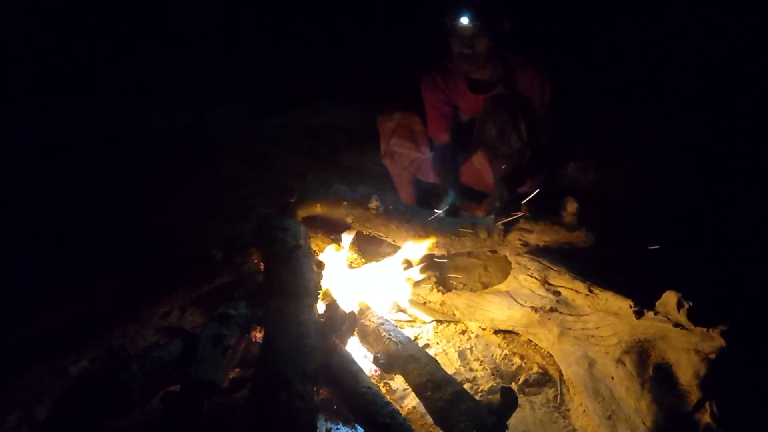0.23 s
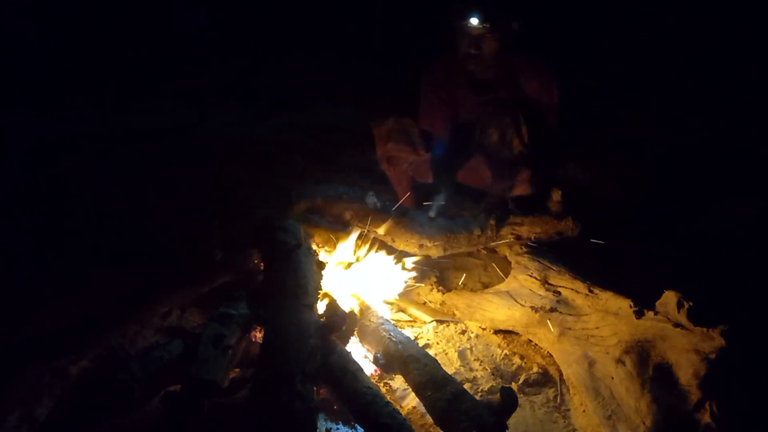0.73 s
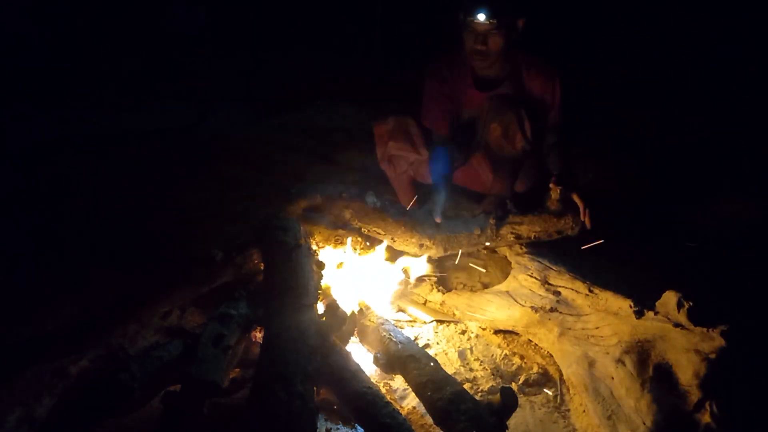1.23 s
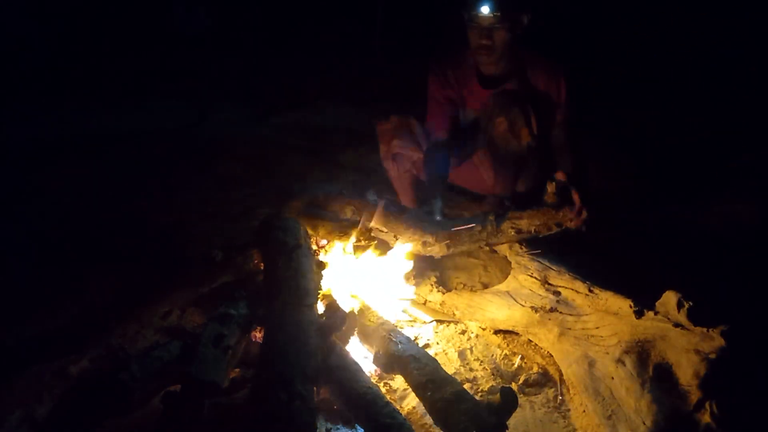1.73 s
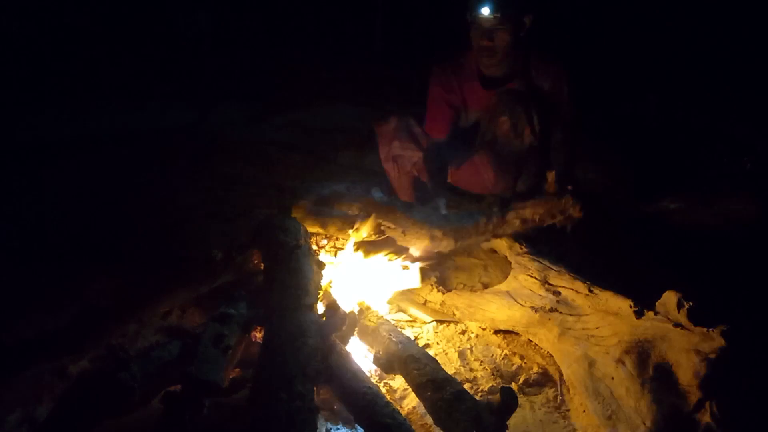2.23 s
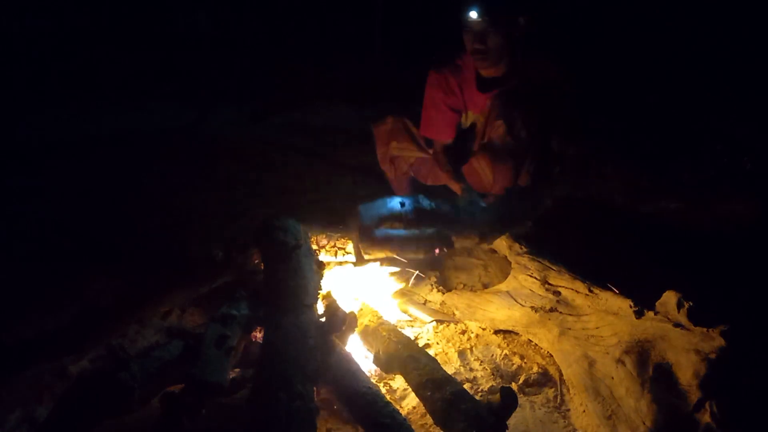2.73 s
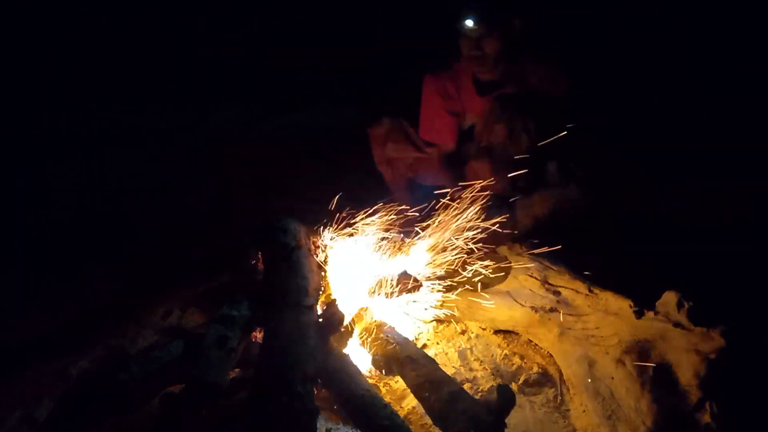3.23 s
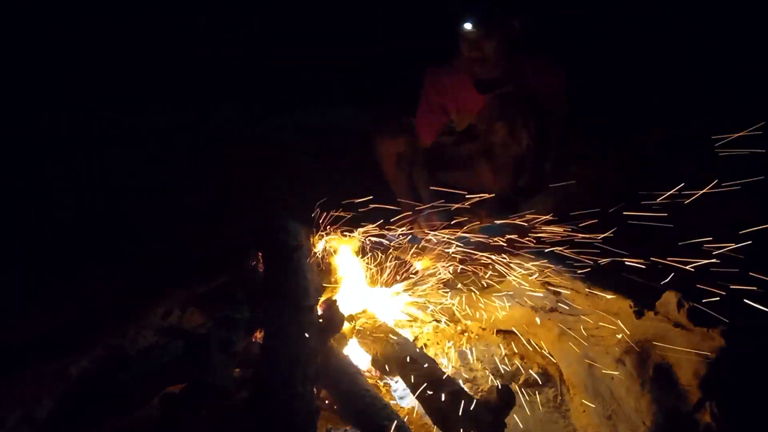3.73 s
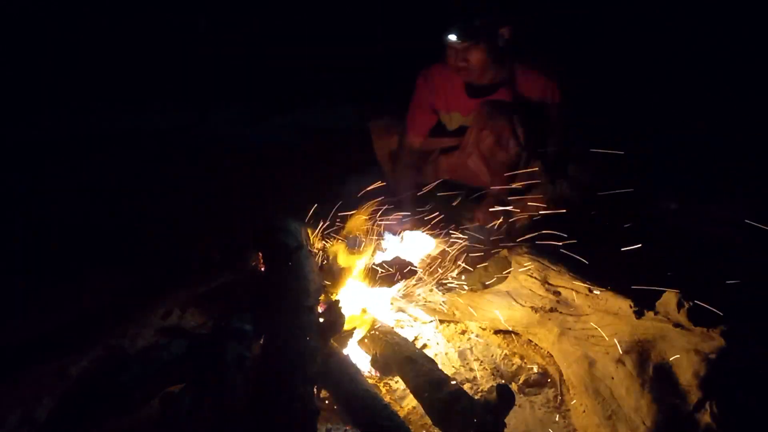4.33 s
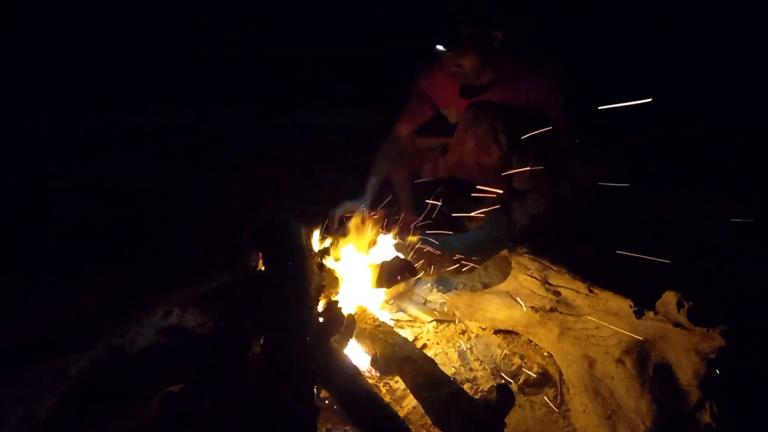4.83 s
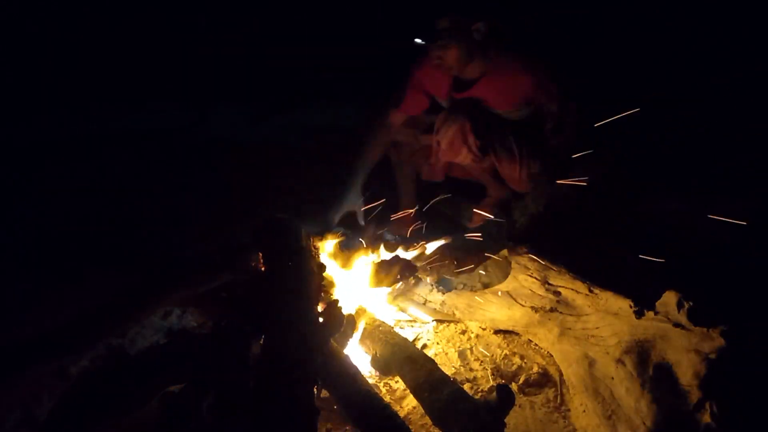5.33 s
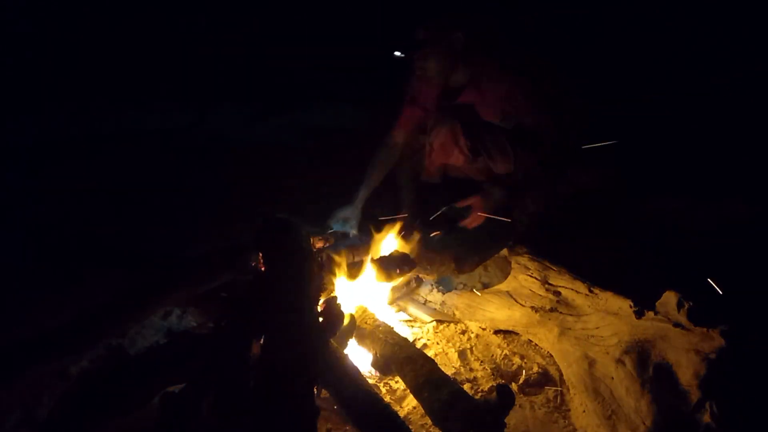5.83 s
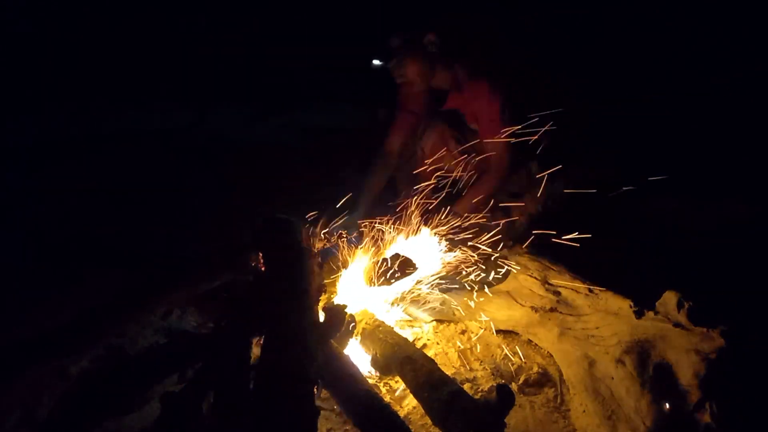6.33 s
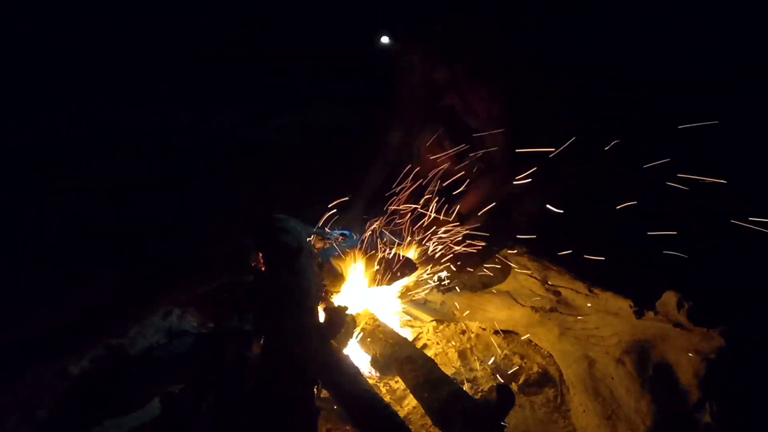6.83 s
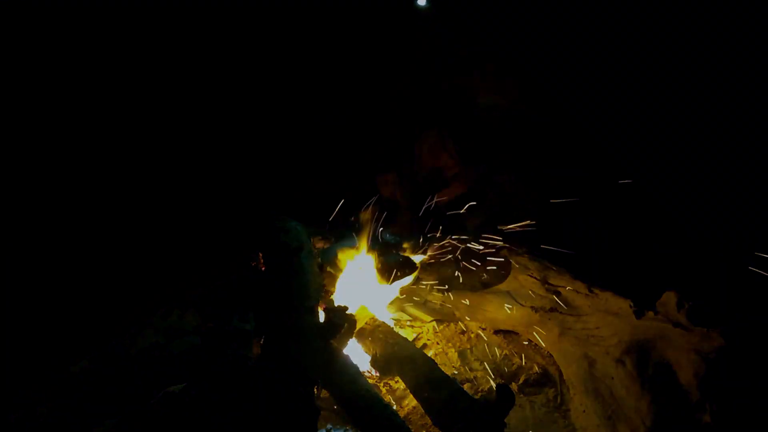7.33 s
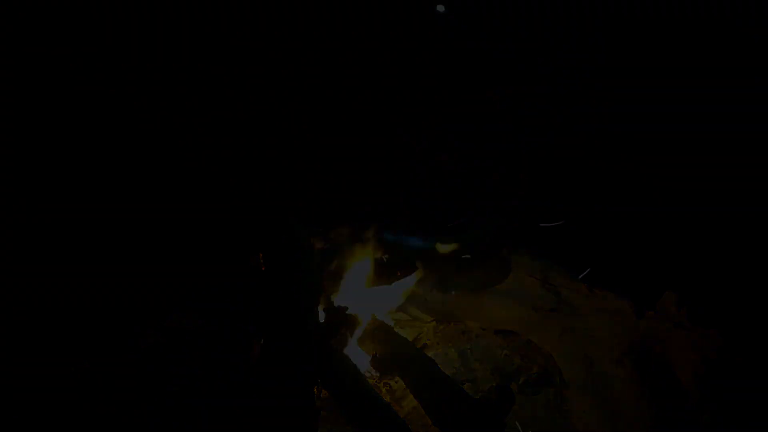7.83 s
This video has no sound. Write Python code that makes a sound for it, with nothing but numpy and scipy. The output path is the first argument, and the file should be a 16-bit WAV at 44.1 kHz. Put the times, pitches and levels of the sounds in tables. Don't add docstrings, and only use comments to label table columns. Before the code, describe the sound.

Outdoors at night, a small wood fire burns close to a stereo microphone: dry snaps, log pops and fine sputter over soft low flame rumble and faint distant surf. A near tree frog trills repeatedly and a katydid rasps quickly, brighter on the right. The biggest cracks come around 3.4 and 4.4 seconds. Later the animals fade, leaving denser crackle and thin sparks.

```python
import sys
import numpy as np
from scipy import signal
from scipy.fft import rfft, irfft, next_fast_len
from scipy.io import wavfile
from scipy.ndimage import uniform_filter1d, map_coordinates

SR = 44100
rng = np.random.default_rng(int(sys.argv[2]) if len(sys.argv) > 2 else 0)


def invert_db(level):
    return 10 ** (np.asarray(level, dtype=float) / 20)


def bounce(signal):
    frames = np.transpose(np.atleast_2d(signal))
    limited = np.clip(frames, -1, 1)
    pcm = np.round(limited * 32767).astype(np.int16)
    wavfile.write(sys.argv[1], SR, pcm)


N = 355879
TIME = np.arange(N) / SR
TOP_HZ = 15750


def unit(x):
    return x / np.sqrt(np.mean(x ** 2) + 1e-20)


def along(points, hz):
    f, v = np.transpose(points)
    return np.interp(np.log(hz + 1), np.log(f + 1), v)


def curves(rows):
    s, *cols = np.transpose(rows)
    return [np.interp(TIME, s, c) for c in cols]


def wobble(rate):
    return map_coordinates(rng.standard_normal(int(N * rate / SR) + 4), [TIME * rate])


def filtered(x, response):
    m = next_fast_len(N + 8192)
    return irfft(rfft(x, m) * response(np.fft.rfftfreq(m, 1 / SR)), m)[..., :N]


def spectrum(points):
    return lambda f: invert_db(along(points, f)) * (f < TOP_HZ)


def band(hz, width):
    def response(f):
        mode = 1j * f * width / (hz * hz - f * f + 1j * f * width)
        return mode ** 2 * (f < TOP_HZ)
    return response


def rush(response, alike, patchy_db):
    z = signal.stft(rng.standard_normal((2, N)), nperseg=512)[2]
    field = uniform_filter1d(rng.standard_normal(z.shape[1:]), size=6, axis=0)
    field = uniform_filter1d(field, size=14, axis=1)
    patchy = signal.istft(z * invert_db(patchy_db * unit(field)), nperseg=512)[1][:, :N]
    a, b = filtered(patchy, response)
    turn = np.arccos(np.clip(alike, -1, 1)) / 2
    return unit(np.array([np.cos(turn) * a + np.sin(turn) * b, np.cos(turn) * a - np.sin(turn) * b]))


def clicks(rate, scatter_db, spread_db):
    count = np.floor(np.cumsum(rate * invert_db(scatter_db * wobble(400))) / SR)
    sizes = invert_db(spread_db * np.minimum(rng.exponential(size=N), 3)) * rng.choice([-1, 1], N)
    return np.diff(count, prepend=0) * sizes


# (low edge [Hz], high edge [Hz])
POP_BANDS = [(2600, 9300), (800, 2600), (160, 800), (9300, 16000)]
# (time [s], crack [dB], wood [dB], snap [dB], t60 [s])
TWIGS = [(0.108, -23.5, 2.5, 17.5, 0.012), (0.2132, -24.5, -11, 5, 0.0066), (1.1592, -17, -9.5, 6.5, 0.011),
         (1.471, -22, -9, -7, 0.035), (2.4956, -15.5, -6, -23, 0.0049), (3.077, -17, -10, -6, 0.014),
         (3.1059, -17.5, 1, -24, 0.021), (3.122, -25, -3, -14, 0.0064), (3.2121, -18.5, 7.5, -25, 0.0092),
         (3.446, -18, 1, -18, .006), (3.461, -19, -18, -14, .01), (3.4684, -20.5, -24, -14, 0.031),
         (4.6439, -19, -5.5, -5, 0.0057), (6.0273, -26.5, -7.5, -12.5, 0.0031),
         (6.0815, -6.5, -25, -4, 0.0064), (6.319, -17.5, -7, -29, 0.012), (6.538, -10.5, -17, -2, 0.005),
         (6.6902, -22, -14, -20, 0.005), (6.7676, 1.5, -11.5, -34, 0.014), (6.7819, -17.5, -6, -12, 0.04),
         (7.229, -20.5, -1, -2.5, 0.014), (7.306, -12.5, -2.5, -27.5, 0.017),
         (7.3195, -24, -3.5, 0.5, .013), (7.522, -20, -2, 12.5, 0.012)]
# (time [s], crack [dB], wood [dB], snap [dB], t60 [s])
LOGS = [(0.2947, -18.5, -23, -11, .018), (0.6693, -12.5, -19, 6, 0.0057), (.675, -22, -17, -60, 0.013),
        (1.4591, -17, -4.5, -2, 0.068), (1.7871, -12.5, -6, -8, .023), (2.3873, -16, -6, -11, 0.023),
        (2.558, -17, -2, -37, 0.0084), (2.9843, -12, -14, -9, 0.0071), (3.0853, -20, -12, -7, 0.058),
        (3.1087, -15, -11, -30, .06), (3.3189, -13.5, -11.5, -18, .05), (3.3708, -1, -35, -33, 0.0017),
        (3.4545, -4, -18, -21, 0.01), (4.331, -7, -20, -6, 0.014), (4.3706, 0.5, -5.5, -3, 0.046),
        (4.3999, -4, -2, -27, 0.02), (4.4846, -19, -23, -18, .033), (6.5133, -14.5, -8.5, -17, 0.041),
        (6.6683, -15.5, -16, 0.5, 0.014), (6.752, -11, -17, 0, .023), (6.838, -17, -34, -21.5, 0.035),
        (7.3431, -22, -3, -30, 0.0074), (7.4383, -5.5, -25.5, -18, 0.004), (7.794, -14, -34, -20.5, 0.0042)]
# (time [s], crack [dB], wood [dB], snap [dB])
TICKS = [(0.9225, -25.5, -7, -17), (1.056, -25.5, -8, -8), (1.083, -27.5, -3.5, -3), (1.3515, -30, -21, -1),
         (2.06, -29.5, -5, -1), (2.7123, -25.5, -9, 8), (4.159, -29, -30, 9), (4.51, -22, -30, -2),
         (5.106, -25.5, -9, 9), (5.1642, -31, -3, -3.5), (5.359, -29, -23, -14), (5.39, -24, -9, 7),
         (5.8603, -27, -2, -9), (5.87, -24.5, -30, 8.5), (5.893, -25, -12.5, -14.5),
         (6.639, -34, -10.5, -8), (6.735, -27, -19, -15), (6.9864, -30, -11, -14),
         (7.0437, -24.5, -25, -16), (7.1306, -34, -21, -6), (7.1415, -33.5, -22, 5),
         (7.2155, -32, -14, 0.5), (7.2582, -42.5, -9, 15), (7.5916, -35.5, -12, 0), (7.629, -36, -17, 4),
         (7.6995, -42.5, -4, 4), (7.91, -21.5, -13, -28.5), (7.926, -28.5, -10.5, -12.5),
         (7.9337, -42, -15, 10)]
# (time [s], crack [dB], wood [dB], snap [dB])
PUFFS = [(0.5108, -30.5, -5, -7), (0.6556, -27, -13, 6), (0.873, -30.5, -9, -12), (1.03, -31, -7, 1),
         (1.3773, -32.5, -3, 12), (1.4305, -31, -6, -1), (1.484, -26, -19, -12), (1.779, -19.5, -7, -6),
         (1.7986, -27, -7, -4), (2.3608, -28, 0, -9), (2.3912, -21, -19, -8), (2.401, -31, -13, -1),
         (2.788, -27, -8, -18), (3.146, -24.5, -25, -23), (3.936, -29, -5, -6), (3.9808, -24.5, -24, -12),
         (4.1643, -28, -1.5, 3), (4.6244, -28, -12, 5), (5.059, -28.5, -4, -6.5), (5.321, -23.5, -24, -8),
         (5.626, -34.5, -2.5, -6), (6.3244, -35.5, -10, -1), (6.5254, -34.5, -12, -7),
         (6.9714, -26, -1.5, -7), (7.023, -26.5, -7, -13.5), (7.4142, -24.5, -10, -13.5),
         (7.7993, -43, -15, -2)]
# (time [s], crack [dB])
SPARKS = [(4.545, -33), (7.374, -36), (7.459, -34), (7.474, -35), (7.552, -38), (7.755, -37.5),
          (7.877, -38), (7.902, -50), (7.956, -37), (7.968, -39), (7.974, -42), (7.983, -36),
          (7.994, -38.5), (8.02, -40)]
# (wood [dB], snap [dB], t60 [s])
SPARK = (-25, 0, 0.0033)
TICK_T60, PUFF_T60 = 0.0075, 0.055
PUSH_T60 = .004
TWIG_WOOD, BARK_WOOD = (-4.5, -6), (-8.5, 4)
LOG_WOOD = (-16, 3)


def pops():
    t = np.arange(SR // 12) / SR
    filters = [signal.butter(2, edges, "bandpass", fs=SR, output="sos") for edges in POP_BANDS]
    out = np.zeros((2, N + len(t)))
    bursts = [(*row, TWIG_WOOD) for row in TWIGS]
    bursts += [(*row, LOG_WOOD) for row in LOGS]
    bursts += [(*row, TICK_T60, BARK_WOOD) for row in TICKS]
    bursts += [(*row, PUFF_T60, BARK_WOOD) for row in PUFFS]
    bursts += [(*row, *SPARK, BARK_WOOD) for row in SPARKS]
    for s, db, wood_db, snap_db, t60, (body_db, thump_db) in bursts:
        noise = rng.standard_normal((3, len(t)))
        ragged = invert_db(20 * uniform_filter1d(noise[2], size=25))
        decay = invert_db(-60 * t / np.clip(t60, .002, .08))
        burst = (noise[0] + .27 * noise[1] * [[1], [-1]]) * ragged * decay
        burst[:, 0] = 3
        push = np.ones((2, 1)) * np.abs(burst.mean(axis=0)) * invert_db(-60 * t / PUSH_T60)
        bands = [signal.sosfilt(f, x) for f, x in zip(filters, [burst, burst, push, burst])]
        levels_db = db + np.array([1.5, wood_db + body_db, wood_db + thump_db, snap_db])
        gains = invert_db(levels_db) * [1, -1, 1, -1]
        pop = sum(g * b / np.linalg.norm(b[0]) for g, b in zip(gains, bands))
        out[:, round(s * SR):][:, :len(t)] += pop
    return out[:, :N] * invert_db([[-1.1], [1.1]])


FADE_S, FADE_DB = 5.61, 10.5
EMBERS_DB, EMBERS_SINK_DB, FLARE_RISE_DB = -66, 4, 259.5
# (time [s], peak level [dB], fall [dB/s])
FLARES = [(3.13, -57.5, 70.5), (3.318, -66, 90), (3.46, -60, 158), (4.43, -52, 40), (5.88, -65, 49),
          (6.82, -54.5, 92), (7.32, -65, 31), (7.931, -65.5, 186)]


def fizz_db():
    embers = EMBERS_DB - EMBERS_SINK_DB * np.maximum(TIME - FADE_S, 0)
    levels = [embers]
    for s, db, fall_db in FLARES:
        levels.append(db + np.minimum(FLARE_RISE_DB * (TIME - s), -fall_db * (TIME - s)))
    return np.max(levels, axis=0)


# (centre [Hz], width [Hz], level [dB])
SPITS = [(2710, 3600, 3), (4130, 9300, 8), (5950, 570, -0.5), (8700, 1900, -18)]
# (frequency [Hz], level [dB per Hz])
FIZZ = [(400, 12.5), (1500, -24), (3000, 13.5), (5500, 6), (9000, 9), (15000, -26)]


def sputter():
    level_db = fizz_db()
    rate = 90 * invert_db(.7 * (level_db + 70) + 5 * wobble(25))
    even = 1 / np.sqrt(uniform_filter1d(rate, size=4000))
    spits = 0
    for hz, width, db in SPITS:
        spit = filtered(clicks(rate, scatter_db=6, spread_db=3) * even, band(hz, width))
        spits = spits + invert_db(db) * unit(spit)
    hiss = invert_db(7.35 * wobble(160)) * rush(spectrum(FIZZ), 0.48, patchy_db=-0.5)
    return invert_db(level_db) * (invert_db(-2) * unit(spits) * invert_db([[-1.1], [1.1]]) + invert_db(-2) * hiss)


def fade_db(s):
    return -FADE_DB * np.maximum(s - FADE_S, 0)


# (start [share of pair], length [share of pair], level [dB])
WING_STROKES = [(.2, .45, 0), (.79, .34, -1)]
GAP_DB, GRIP, LIFT = -23, .068, .02


def stroke_db(pairs):
    levels = []
    for start, length, db in WING_STROKES:
        since = (pairs - start) % 1
        loose = np.where(since < length, np.exp(-since / GRIP), np.clip((since - length) / LIFT, 0, 1))
        levels.append(db + GAP_DB * loose)
    return np.max(levels, axis=0)


KATYDID_DB = -46
FIRST_PAIR_S, PAIR_S, PAIR_TIRES_S = -.0092, .08796, 8.33e-6
# (frequency [Hz], level [dB per Hz])
WING = [(7500, -40), (9000, -15), (10500, -8), (11700, -7), (12800, -3), (14000, -1.5), (15000, 0),
        (15700, -3)]
# (frequency [Hz], level [dB per Hz])
CHORUS = [(2500, -34), (3300, -21), (4400, -32), (6200, -32), (8400, -13), (10700, 0), (12000, -5),
          (14500, -6), (15700, -8)]


def katydid():
    done = np.arange(100)
    pairs = np.interp(TIME, FIRST_PAIR_S + PAIR_S * done + PAIR_TIRES_S * done * done, done)
    stroke = invert_db(stroke_db(pairs))
    late_stroke = invert_db(stroke_db(pairs - .09))
    teeth = np.abs(unit(clicks(520, scatter_db=1.2, spread_db=1.5))) + 1.1 * rng.standard_normal(N)
    saw = unit(filtered(teeth * stroke, spectrum(WING)))
    left = filtered(saw, lambda f: np.exp(-2j * np.pi * f * 14e-6))
    saw = np.array([invert_db(-2.5) * left, invert_db(4) * saw])
    cell = unit(filtered(rng.standard_normal((2, N)) * late_stroke ** .6, band(10800, 900)))
    blur = rush(spectrum(CHORUS), 0.016, patchy_db=2)
    song = saw + invert_db(-4) * cell * invert_db([[-3], [1.5]]) + invert_db(-2.5) * blur * invert_db([[1.5], [-1.5]])
    return invert_db(KATYDID_DB + fade_db(TIME) + .7 * wobble(12)) * song


SWELL_PULSES, DRAG_SHARE = 7.5, .62


def trill(start, pulses, gap, growth, db, swell_db, drag_s):
    k = np.arange(pulses + 1)
    at = start + gap * k + growth * k * k + drag_s * DRAG_SHARE ** (pulses - k)
    level_db = db - swell_db * np.exp(-k / SWELL_PULSES) + fade_db(at)
    heard = (at > .01) & (at < N / SR)
    return at[heard], level_db[heard]


def frog(trills, hz, fall_hz, swell_db, drag_s, wet_db):
    t = np.arange(-SR // 40, SR // 40) / SR
    out = np.zeros(N + 2 * len(t))
    for row in trills:
        for at, db in zip(*trill(*row, swell_db, drag_s)):
            chance = rng.standard_normal(4)
            beat = np.cos(2 * np.pi * (175 + 12 * chance[0]) * (t + .0115))
            depth = np.clip(.25 - t / .006, .25, 1)
            puffs = 1 - depth * ((1 - beat) / 2) ** 0.58
            rise = np.clip((t + .016) / .012, 0, 1) ** .6
            swell = rise * invert_db(-60 * (np.maximum(t - .004, 0) / .014) ** 2)
            cycles = (hz + 25 * chance[1]) * t - fall_hz * t * t / 0.055
            tone = np.sin(2 * np.pi * cycles + 3 * chance[2])
            pulse = invert_db(db + 4.0 + 1.1 * chance[3]) * swell * puffs * tone
            out[round((at - .004) * SR):][:len(t)] += pulse
    dry = out[-round(t[0] * SR):][:N]
    tail = rng.standard_normal((2, SR // 8)) * invert_db(-60 * np.arange(SR // 8) / SR / .14)
    leaves = signal.fftconvolve(dry[None], tail / np.linalg.norm(tail[0]), axes=1)[:, :N]
    return dry * invert_db([[-1.1], [1.1]]) + invert_db(wet_db) * leaves


# (start time [s], count [pulses], gap [s], gap growth [s/pulse], level [dB])
NEAR_FROG = [
    (-1.499, 31, .05, 0, -43),
    (.735, 31, .0497, .000085, -43),
    (3.136, 35, .0508, 0, -42.5),
    (5.926, 35, .051, .000016, -43),
]
# (start time [s], count [pulses], gap [s], gap growth [s/pulse], level [dB])
FAR_FROG = [
    (.166, 5, .0505, .00074, -60),
    (2.454, 11, .0485, .00036, -58.5),
    (4.996, 15, .047, .00017, -58.5),
]


def tree_frogs():
    near = frog(NEAR_FROG, 3215, fall_hz=330, swell_db=25, drag_s=.039, wet_db=-9)
    far = frog(FAR_FROG, 3387, fall_hz=260, swell_db=1.5, drag_s=0, wet_db=-3)
    return near + far


# (time [s], length [s], level [dB])
PEEPS = [(0.565, 0.09, -65), (1.106, 0.042, -69), (1.173, 0.077, -64), (3.49, 0.07, -73),
         (3.54, 0.076, -65), (5.275, 0.088, -71), (5.46, 0.11, -68), (5.63, 0.059, -64),
         (6.274, 0.028, -76)]


def peeps():
    gate = sum(invert_db(db) * np.exp(-((TIME - s) / (length / 2)) ** 4) for s, length, db in PEEPS)
    return gate * rush(band(2350, 110), .6, patchy_db=0)


# (start time [s], end time [s], level [dB])
BOUTS = [
    (-.1, 0.843, -62),
    (4.593, 5.763, -61.5),
]
BUZZ_REST_DB, BUZZ_EDGE_S = -74, .11
# (centre [Hz], width [Hz], level [dB re katydid])
DRONES = [(3910, 530, -21.5), (4765, 260, -21), (6750, 440, -25.5), (7470, 450, -21.5)]


def crickets():
    buzz_db = BUZZ_REST_DB + fade_db(TIME)
    for start, end, db in BOUTS:
        inside = np.clip(.5 + np.minimum(TIME - start, end - TIME) / BUZZ_EDGE_S, 0, 1)
        buzz_db = buzz_db + (db - BUZZ_REST_DB) * inside
    throb_db = 3 * np.sin(2 * np.pi * 95 * TIME) + .8 * wobble(8)
    buzz = invert_db(buzz_db + throb_db) * rush(band(5590, 320), 0.39, patchy_db=2.5)
    drones = 0
    for hz, width, db in DRONES:
        drones = drones + invert_db(db + 1.5 * wobble(2.84)) * rush(band(hz, width), 0.5, patchy_db=2)
    return buzz + invert_db(KATYDID_DB + fade_db(TIME)) * drones


# (time [s], rumble level [dB], surf level [dB])
ROAR = [(0.0, -45.5, -60), (7.87, -43.5, -57), (8.07, -43, -56)]
# (frequency [Hz], level [dB per Hz])
RUMBLE = [(12, -55), (20, 4), (49, 3), (81, 2.5), (112, -5), (140, -9), (200, -26), (260, -36), (440, -120)]
# (frequency [Hz], level [dB per Hz])
SURF = [(71, -53), (120, -4), (184, -2), (463, -14.5), (1240, -29.5), (2810, -40.5), (3170, -38.5),
        (5630, -38), (11300, -45), (16000, -67)]


def flame_and_surf():
    rumble_db, surf_db = curves(ROAR)
    flutter = invert_db(rumble_db + 3 + 1.5 * wobble(7))
    rumble = flutter * rush(lambda hz: invert_db(along(RUMBLE, hz)), .975, patchy_db=1.2)
    surf = invert_db(surf_db + 3) * rush(spectrum(SURF), .98, patchy_db=1.2)
    return rumble * invert_db([[-.3], [.3]]) + surf * invert_db([[-.4], [.4]])


def scene():
    fire = pops() + sputter()
    night = katydid() + tree_frogs() + peeps() + crickets()
    return fire + night + flame_and_surf()


def top_cut(x):
    return signal.sosfilt(signal.butter(12, 17000, fs=SR, output="sos"), x)


LAG_CYCLES, LAG_HZ = .8, 90


def record(dry):
    def microphone(hz):
        limit = invert_db(np.interp(hz, [15700, 16000, 16900, 17000], [0, -22, -22, -120]))
        return limit * np.exp(-2j * np.pi * LAG_CYCLES * np.log(1 + hz / LAG_HZ))
    held = dry / (1 + np.abs(dry / .45) ** 3) ** (1 / 3)
    return top_cut(filtered(held, microphone))


dry = scene()
out = record(dry)
bounce(out)
```